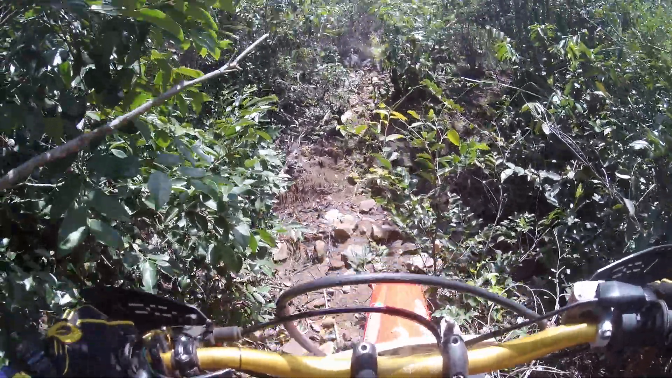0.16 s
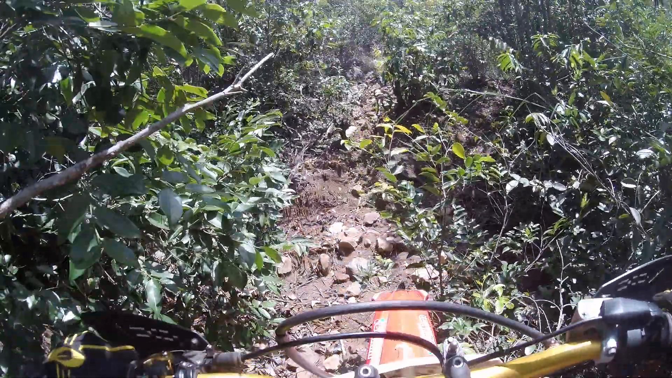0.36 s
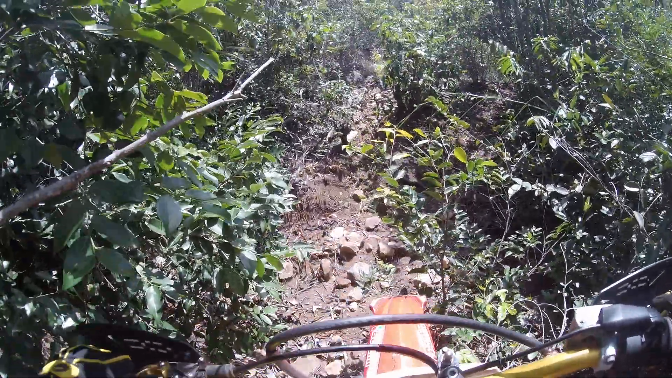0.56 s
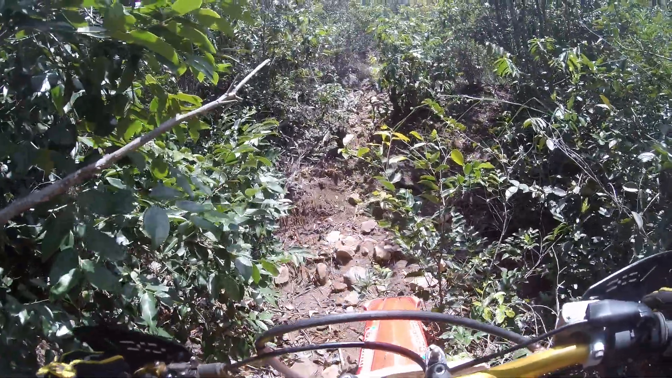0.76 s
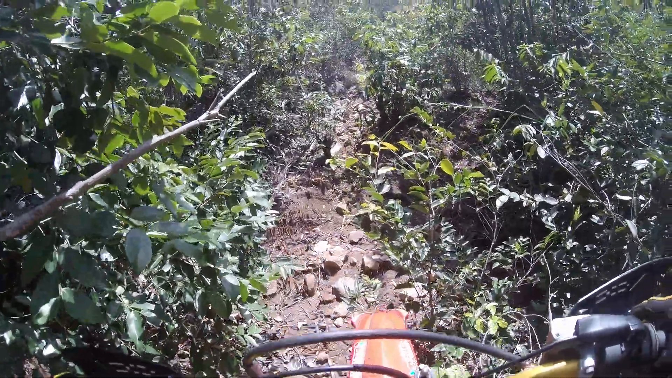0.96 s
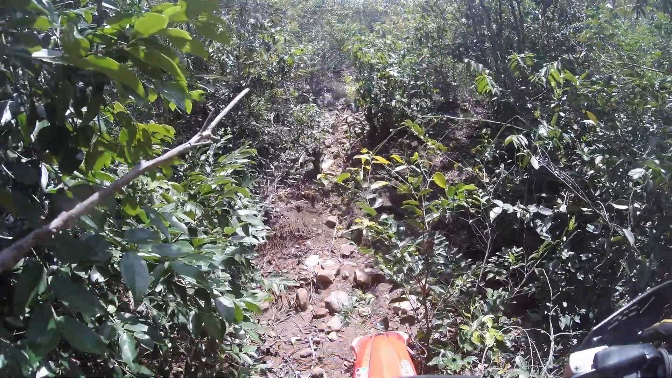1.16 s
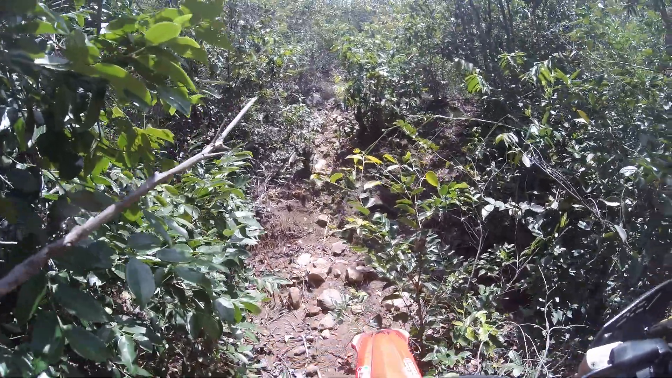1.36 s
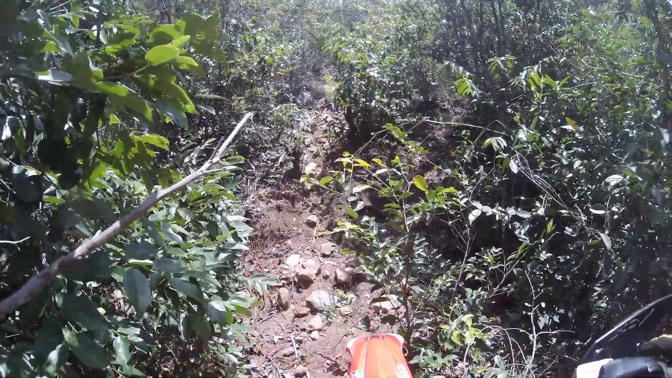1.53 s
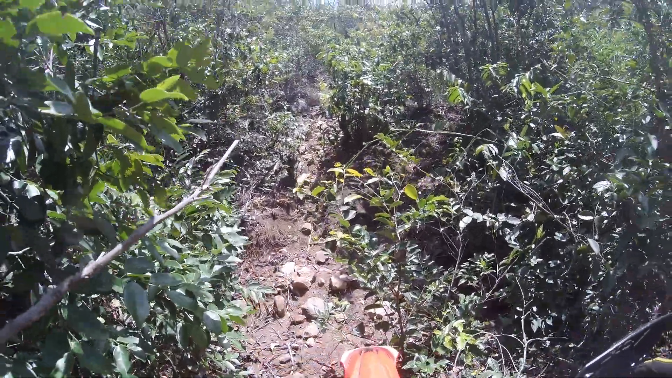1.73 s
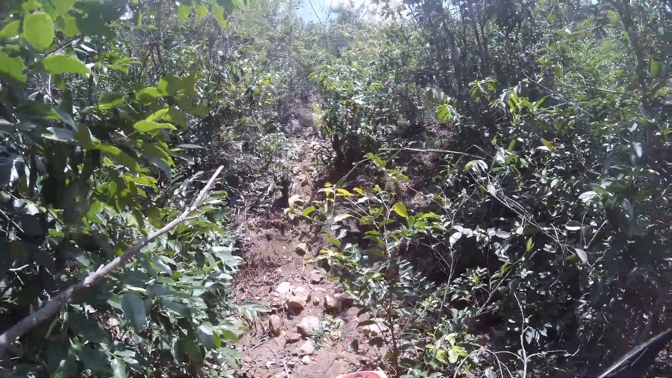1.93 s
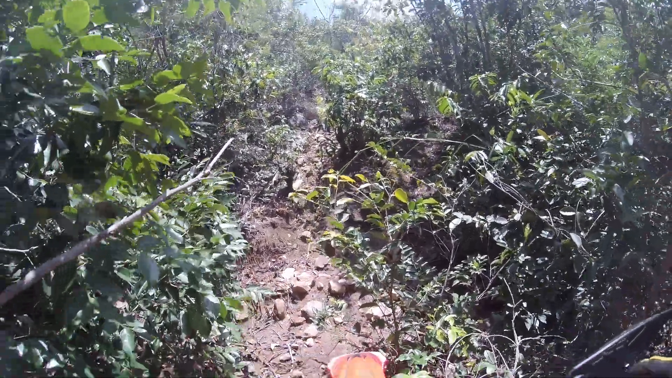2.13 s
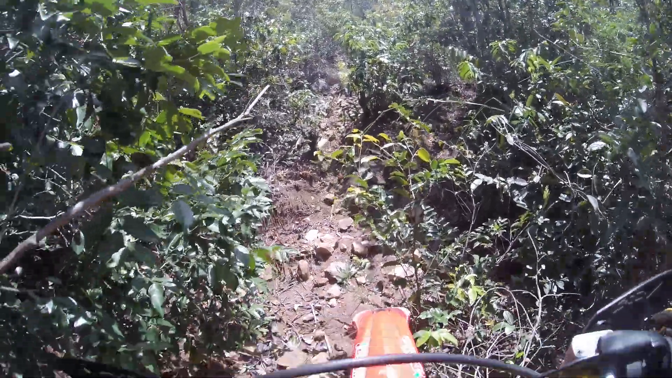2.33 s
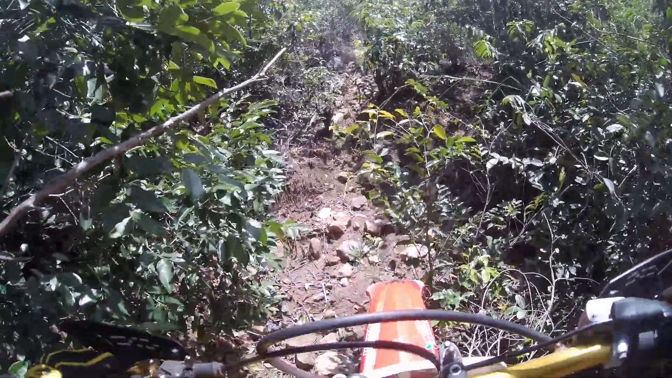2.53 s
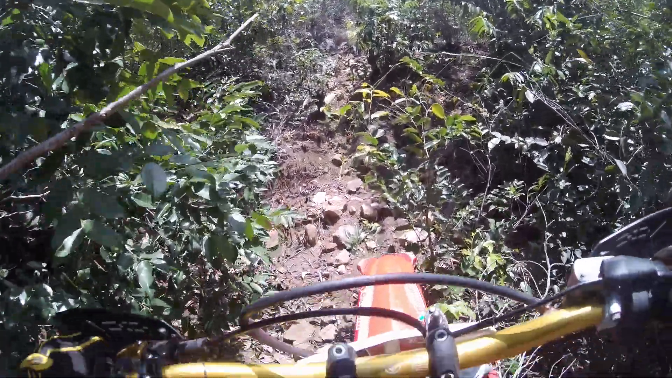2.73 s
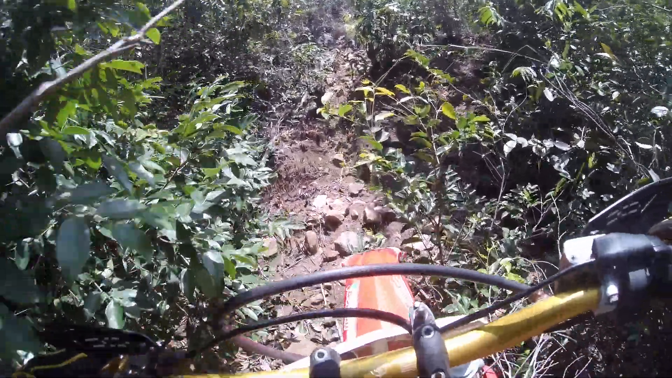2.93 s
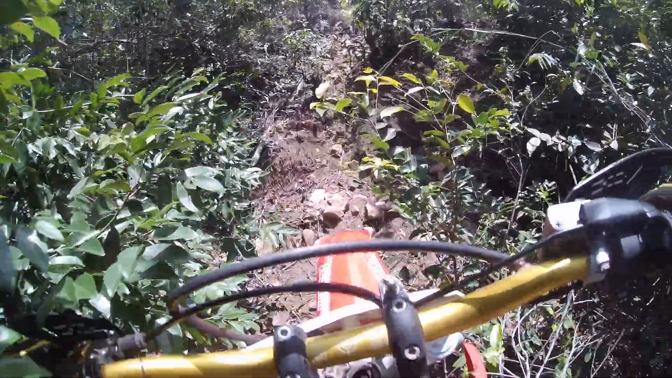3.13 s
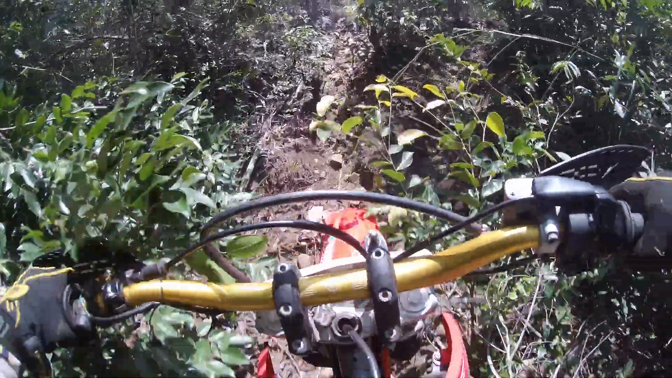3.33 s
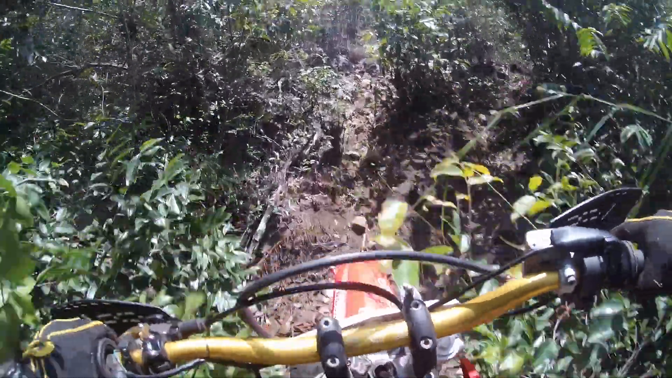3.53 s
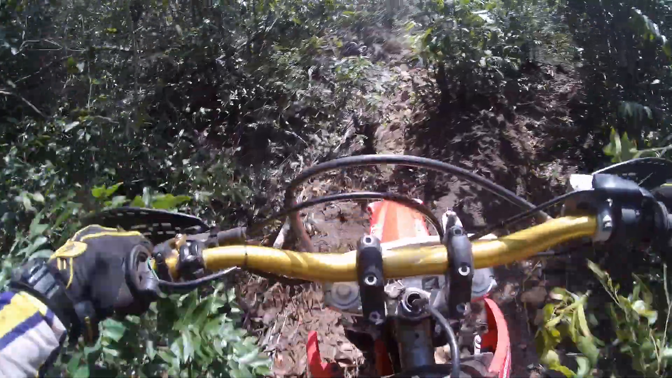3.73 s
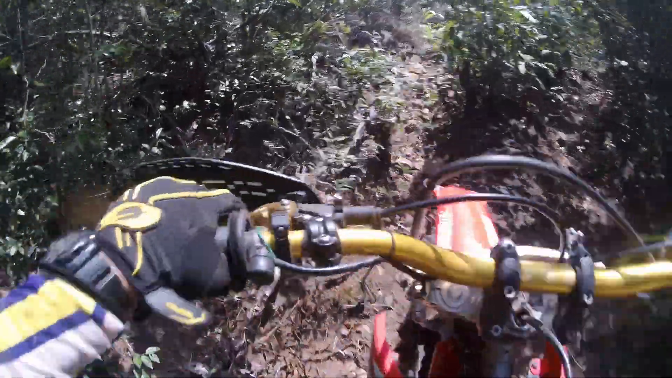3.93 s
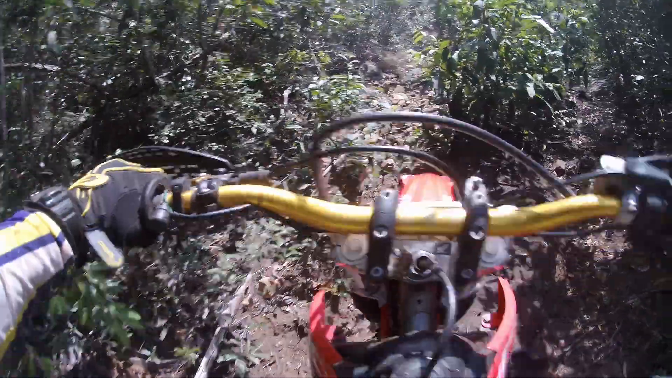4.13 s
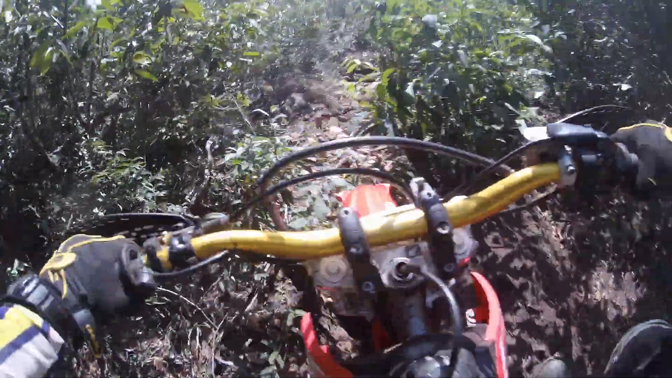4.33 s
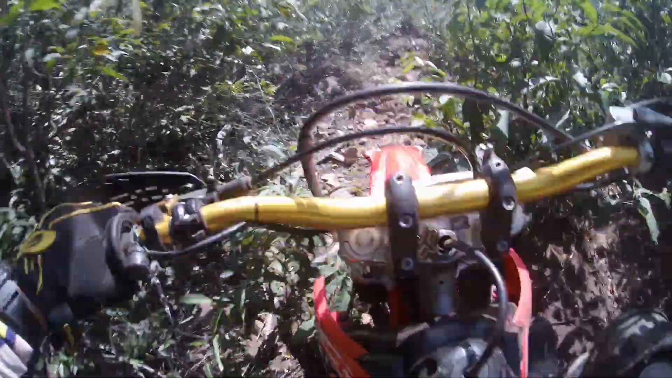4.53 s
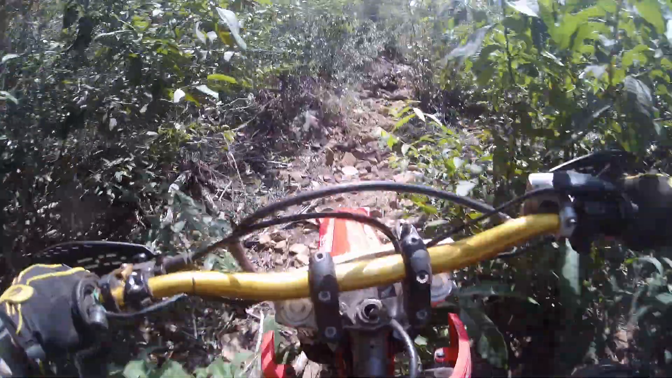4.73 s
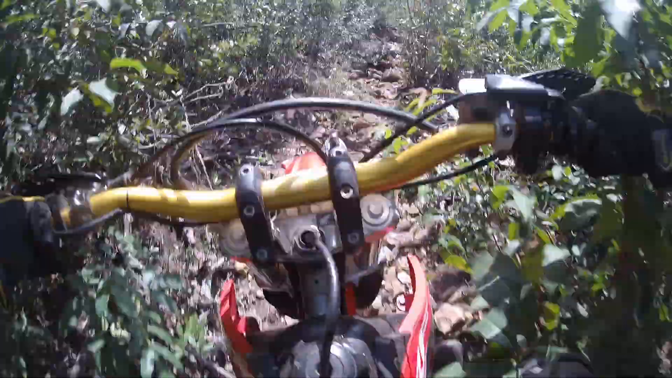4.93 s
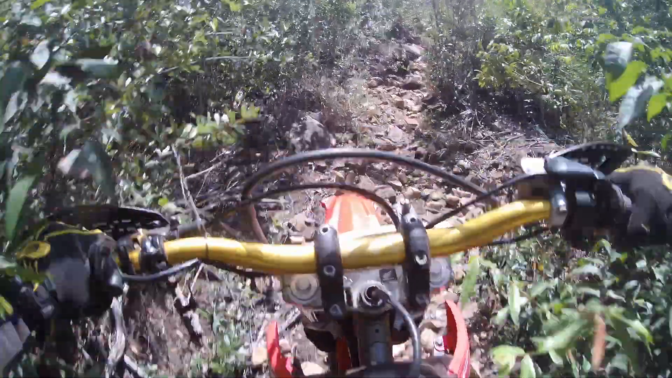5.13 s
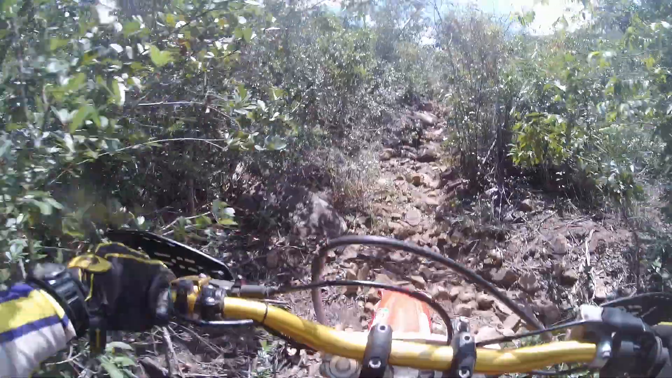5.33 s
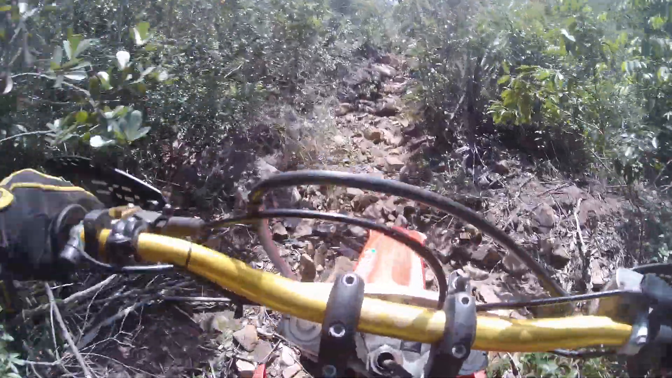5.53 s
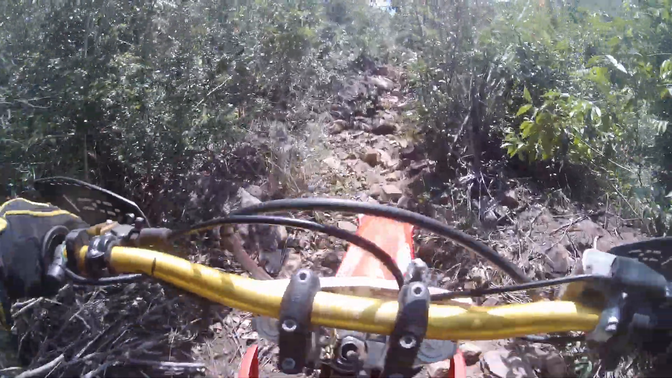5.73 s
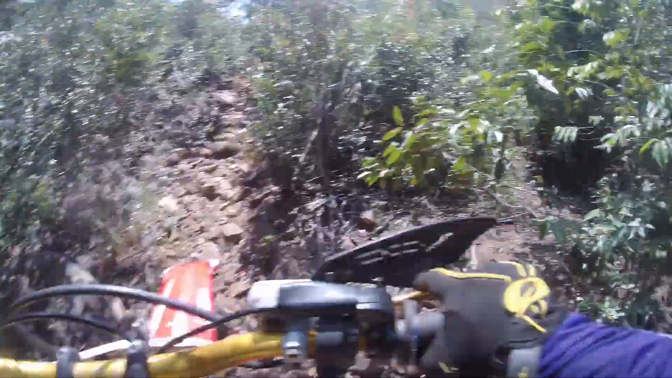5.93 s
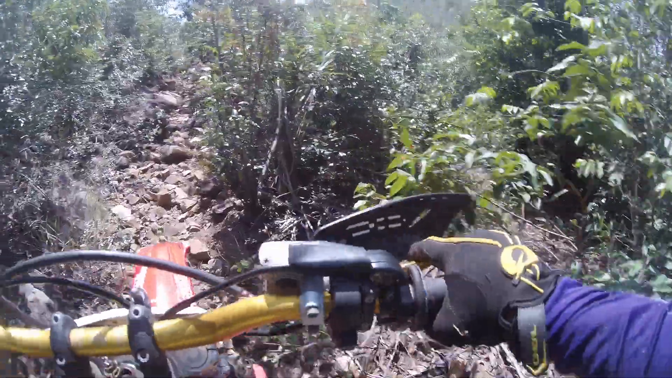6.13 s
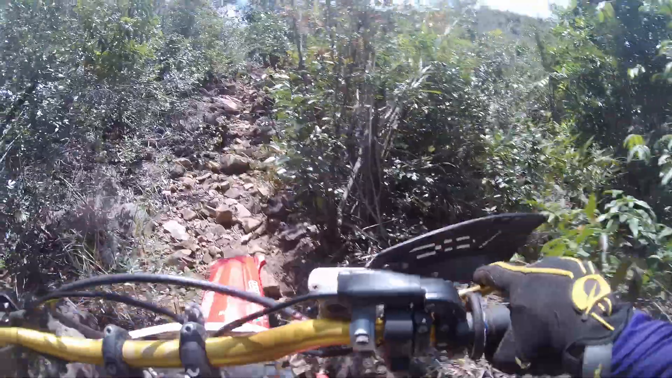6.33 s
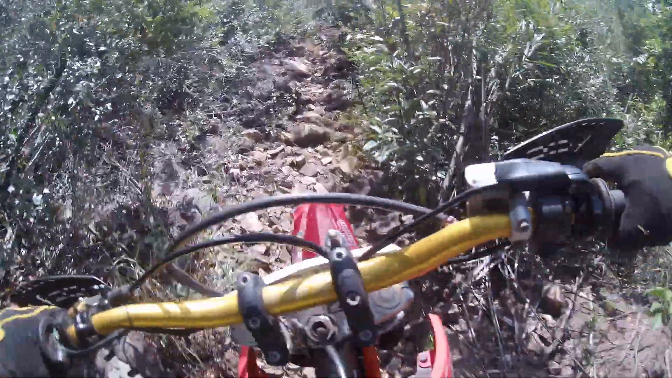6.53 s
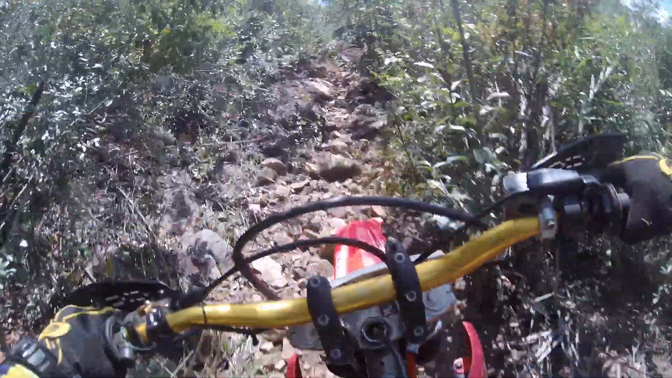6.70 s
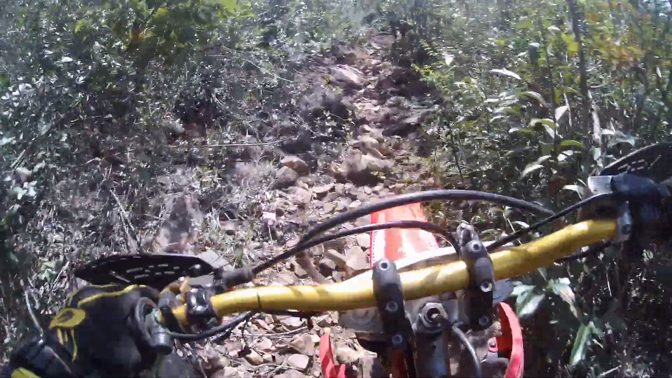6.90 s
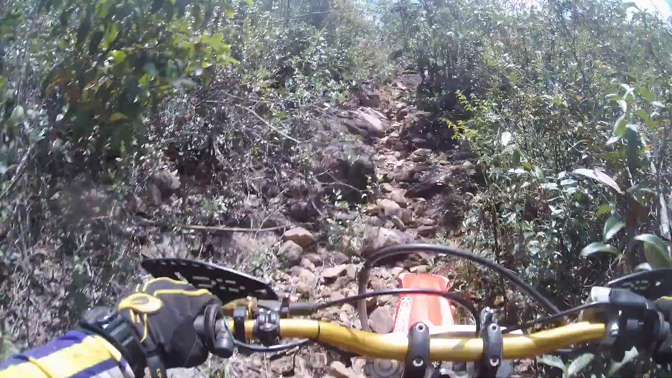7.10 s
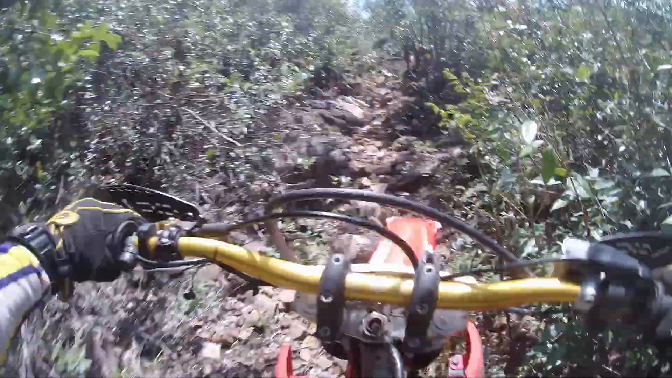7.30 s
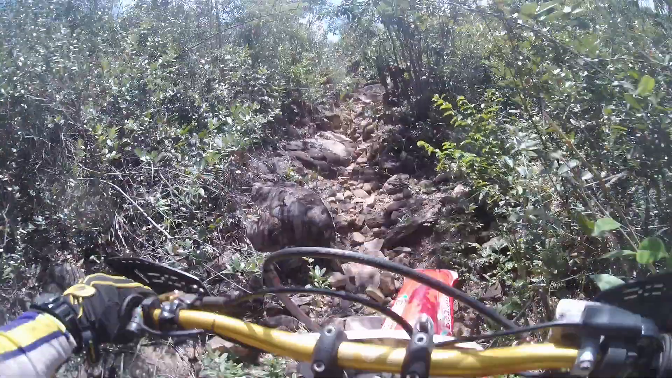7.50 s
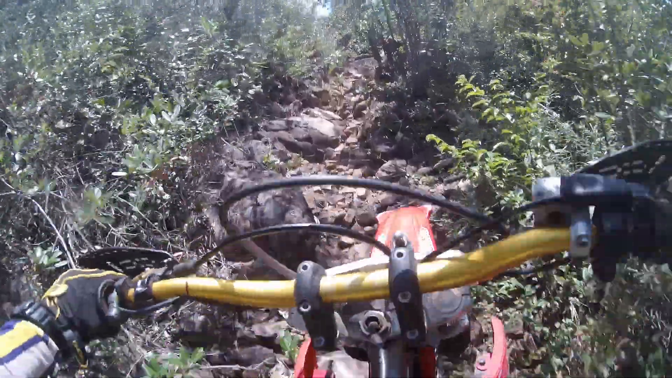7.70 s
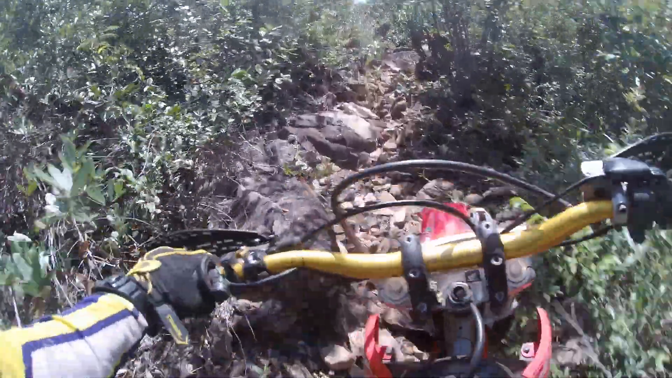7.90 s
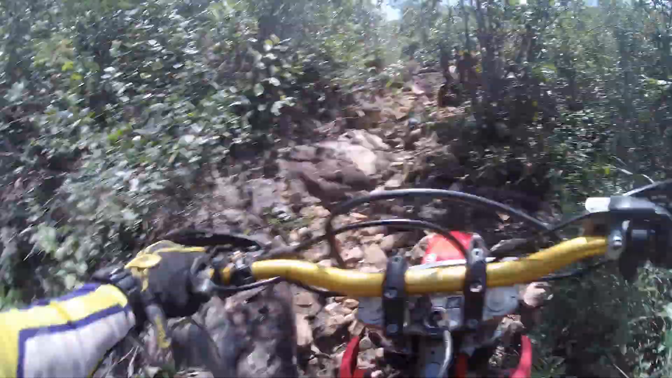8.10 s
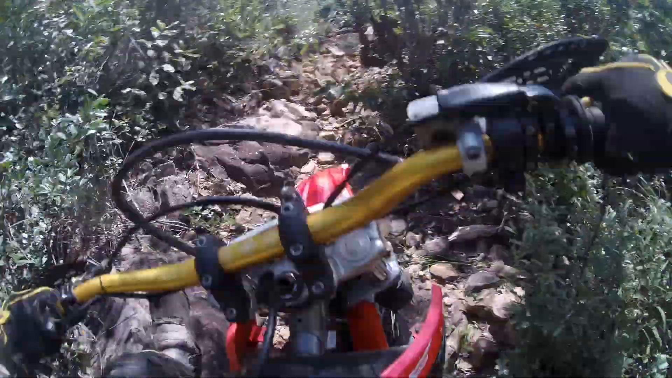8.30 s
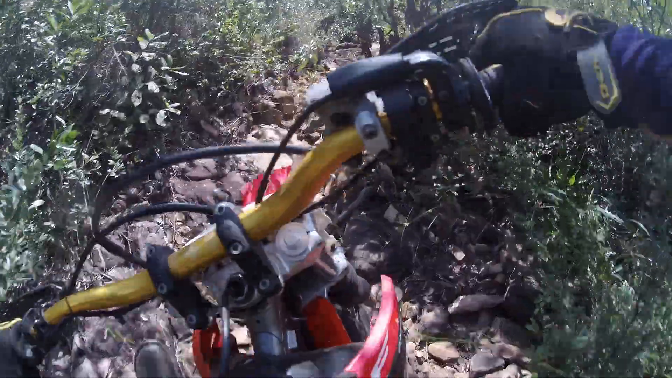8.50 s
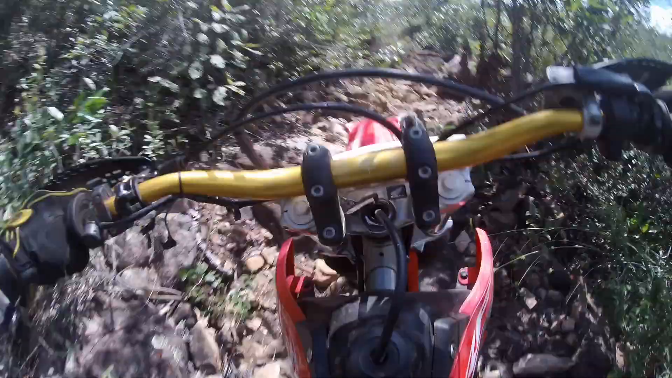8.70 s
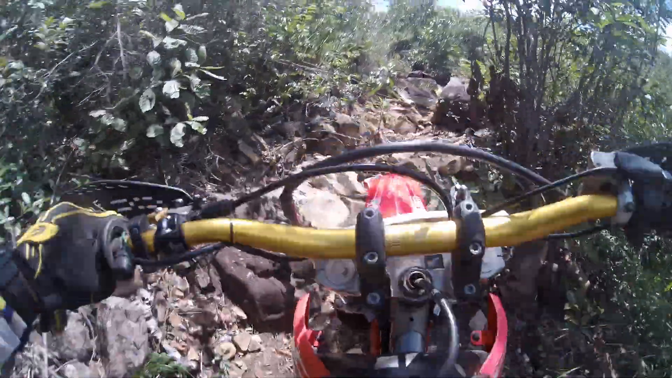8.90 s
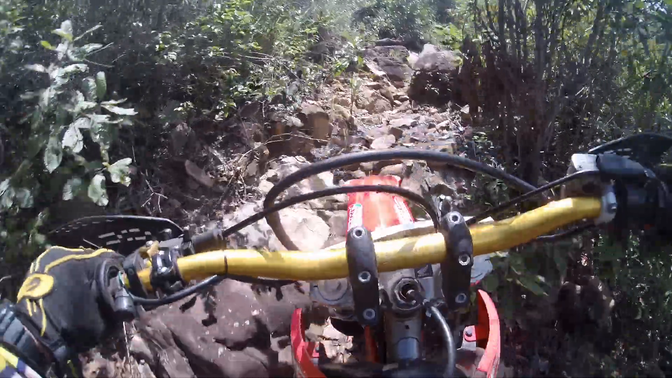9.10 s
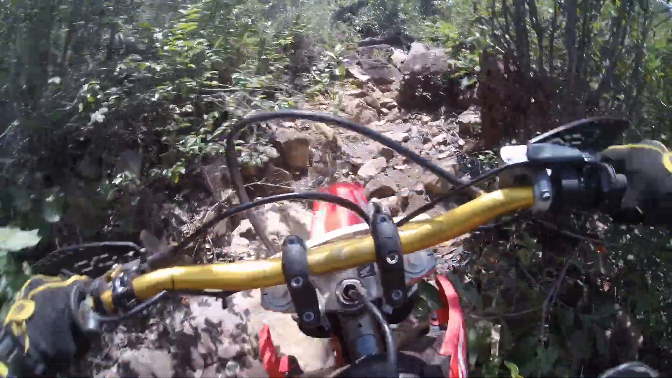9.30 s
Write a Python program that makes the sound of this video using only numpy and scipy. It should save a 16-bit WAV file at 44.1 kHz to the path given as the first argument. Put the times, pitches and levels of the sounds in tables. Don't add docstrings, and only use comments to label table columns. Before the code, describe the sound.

Weak, slow turning-over opens the scene; an electric starter grinds at about 0.1-0.35 s and a two-stroke engine catches around 0.4 s, with a few snaps and knocks by 0.75 s. Until 2 s it ticks along lightly, low uneven pops under hissing piston clatter. From 2.2 s it loads up, and a gear whine slides and wavers with the clutch near 2.7 s. After 3.3 s the bike climbs: wheels rumble over rubble, rocks thump and rattle. Hard blows land near 4.0, 4.6 and 4.9 s, revs dipping then recovering. Steadier lugging follows, with knocks near 6 s, then violent bangs at 7.35 and 7.5 s, a ringing shell, and dense jolts from 8.1 to 8.8 s. Faint falling chain squeaks appear at 8.3-8.95 s as the engine bogs and quietens, before pulling again around 9.3 s. Close, muffled, boxy helmet microphone outdoors, overloading on impacts.

```python
import sys
import numpy as np
from scipy import signal
from scipy.fft import rfft, irfft, next_fast_len
from scipy.io import wavfile
from scipy.ndimage import uniform_filter1d, map_coordinates

SR = 44100
rng = np.random.default_rng(int(sys.argv[2]) if len(sys.argv) > 2 else 0)


def output_pcm(signal):
    pcm = np.clip(np.atleast_2d(signal).T, -1, 1) * 32767
    wavfile.write(sys.argv[1], SR, np.round(pcm).astype(np.int16))


def field_ratio(decibels):
    return 10 ** (np.asarray(decibels, dtype=float) / 20)


N = 412335

# f/Hz, level/dB
CASE_COLOUR = [(290, -10), (500, -12), (629, -25), (901, -14), (1150, -4.5), (1430, -20.5), (1700, -15.5),
               (1990, -32), (2330, -13.5), (3150, -9), (3740, -4.5), (5510, -14.5), (8600, -22),
               (10100, -17.5), (15500, -25)]
# f/Hz, width/Hz, level/dB
MOUNT_MODES = [(137, 83.5, 9.5), (321, 164, 3), (1120, 347, -2)]
# t/s, roughness/dB
RUBBLE = [(0, -47), (.6, -31), (1.2, -47), (2.2, -45), (2.45, -31), (3.3, -30), (3.65, -26), (4.4, -22),
          (4.65, -33), (5.4, -28), (6.9, -28), (7.8, -30), (8.15, -27), (8.85, -38), (9.35, -27)]
# t/s, thump level/dB, rattle level/dB
ROCK_JOLTS = [(0.404, -48, -30), (0.677, -39, -23.5), (0.743, -42, -30), (3.318, -18, -33),
              (3.596, -11, -17), (3.658, -18, -23), (3.807, -11, -19), (3.96, -51, -17),
              (3.991, -10.5, -28), (4.302, -16, -29), (4.512, -12, -36), (4.604, 0.5, -6.5),
              (4.892, -7, -9.5), (5.407, -13, -22.5), (5.946, -23, -15), (6.242, -8, -17.5),
              (6.435, -14, -28), (6.809, -13.5, -38), (7.106, -11, -23), (7.347, -30, -7.5),
              (7.507, 0, -13.5), (7.563, -9.5, -35), (7.943, -7, -15), (8.137, -11, -15), (8.164, -3, -3),
              (8.273, -11, -12), (8.365, -12, -23), (8.437, -7.5, -48), (8.515, -19, -52),
              (8.641, -13, -16), (8.757, -1, -14.5), (8.955, -13, -36), (9.291, -18, -15.5)]
# t/s, level/dB
STARTER_LEVEL = [
    (0.12, -58),
    (0.2, -27.5),
    (0.34, -33.5),
]
# t/s, peak level/dB, t60/s, tilt/dB an octave
SHARP_SNAPS = [(0.3902, -14.5, 0.11, -2), (0.633, -14.5, 0.19, -6.5), (0.667, -8.5, 0.019, -4),
               (0.672, -21, 1, -1), (0.73, 3, 0.006, -15.5), (2.355, -14, 0.17, -4.5),
               (2.435, -12, 0.12, -3), (3.299, -6, 0.059, 16), (3.457, -13, 0.21, 6),
               (3.971, 8, 0.0031, -7), (4.8031, -17.5, 0.65, -1.5), (5.04, -17, 0.037, 4),
               (5.4833, -10, 0.13, -1.5), (6.1665, -11.5, 0.027, -4.5), (7.1453, -2.5, 0.032, -5),
               (8.15, 6.5, 0.0065, -13), (8.635, -20, 0.2, -5.5)]
# t/s, length/s, start f/Hz, end f/Hz
CHAIN_SQUEAKS = [
    (8.31, .07, 3050, 2980),
    (8.38, .08, 2980, 2550),
    (8.5, .085, 3050, 2350),
    (8.67, .06, 3400, 2900),
    (8.92, .05, 3800, 3300),
]
# t/s, peak level/dB,
# f/Hz
HELMET_KNOCKS = [(0.666, -17, 435), (.733, -19, 467), (2.779, -22, 597), (2.815, -23.5, 605),
                 (3.805, -28.5, 323), (3.971, -6, 400), (4.297, -7.5, 190), (4.428, -7.5, 212.4),
                 (4.507, -8, 178), (4.596, 6, 295), (4.895, 1, 168), (4.915, -13, 120), (5.935, -9, 222),
                 (5.953, -10, 297), (6.165, -35, 496), (7.344, 8, 231.5), (7.353, 3, 97.2),
                 (7.509, -17, 296), (8.135, -2, 140.4), (8.151, -19, 467), (8.258, -9, 130),
                 (8.272, 0.5, 280), (8.445, -4, 154), (8.503, -14.5, 300), (8.614, -13, 294),
                 (8.625, -12, 300), (8.705, -17, 260), (8.642, -18, 377), (8.655, 2, 123), (8.677, -4, 202),
                 (8.762, -1, 189), (8.958, -19, 264)]
# t/s, peak level/dB, f/Hz, t60/s
STRUCK_PARTS = [
    (.735, -31, 486, 0.27),
    (5.362, -25, 465, 0.22),
    (5.435, -23, 478, 0.42),
    (7.145, -11, 1327, 0.027),
    (7.147, -19, 1650, 0.025),
    (7.348, -7, 477, 0.26),
    (8.175, -12, 466, 0.18),
    (8.37, -32, 475, 0.23),
    (8.524, -40, 470, 0.21),
    (8.956, -34, 478, .2),
]
# t/s, rate/turns a second
CRANK_SPEED = [(0, 12.7), (0.29, 11.81), (0.39, 25.42), (0.56, 24.29), (0.63, 28.86), (1.43, 25.37),
               (1.66, 26.4), (2.85, 26.05), (3.63, 29.42), (4.3, 30.69), (4.63, 33.49), (4.93, 22.74),
               (5.6, 29.89), (6.93, 25.65), (7.92, 27.18), (8.42, 20.47), (8.93, 19.56), (9.36, 25.92)]
# t/s, sudden change/turns a second
WHEEL_GRIPS = [(0.3, 1.3), (0.41, -1.3), (0.74, 2.34), (2.12, -2.4), (2.63, 5.23), (2.73, 6.69),
               (2.88, 2.29), (3.48, -4.42), (3.93, 1.5), (4.23, -2.59), (4.49, -6.34), (5.02, -1.88),
               (5.15, 4.45), (5.7, -1.45), (5.77, -1.85), (6.17, 1.57), (6.46, -3.61), (6.96, -1.33),
               (7.96, 2.36), (8.27, -3.76), (8.73, 1.56), (8.93, -3.6)]
# t/s, full firing peak level/dB, mechanical effort level/dB
ENGINE_WORK = [(0, -38, -48), (.3, -10, -35), (.68, -16.5, -34.5), (.88, -11.5, -32.5),
               (1.06, -17.5, -36.5), (2.05, -18.5, -37), (2.36, -10, -34), (2.6, -9, -28.5),
               (2.82, -6.5, -27.5), (3.3, -8.5, -27.5), (4.3, -7, -28), (4.85, -11.5, -33),
               (5.3, -7.5, -28.5), (6.9, -8.5, -29.5), (7.5, -9, -31.5), (8.1, -8, -30), (8.88, -20, -43.5),
               (9.3, -6, -25.5)]
# t/s, tooth-meeting f/Hz, load level/dB
GEAR_COURSE = [(.66, 1096, -56), (.86, 1240, -35), (1.06, 1078, -70), (2.2, 1122, -42.5),
               (2.6, 1120, -41.5), (2.71, 1392, -37.5), (2.86, 1426, -44), (2.89, 1282, -41),
               (3.45, 1253, -44), (4.12, 1332, -41), (4.6, 1240, -39.5), (4.95, 1062, -79),
               (5.2, 1263, -45), (5.8, 1221, -41.5), (6.12, 1310, -40), (6.5, 1178, -45), (7.9, 1240, -44),
               (8.2, 1094, -67)]
# t/s, length/s, start f/Hz, end f/Hz
CHAIN_SNATCHES = [(.75, .07, 1420, 1270), (.82, .15, 1270, 1180), (2.2, .1, 1090, 1110),
                  (2.31, .04, 1150, 1110), (2.355, .07, 1240, 1115), (2.44, .12, 1290, 1020),
                  (2.58, .04, 1170, 1090), (2.62, .04, 1270, 1190), (2.7, .16, 1410, 1425),
                  (2.89, .5, 1285, 1245), (3.48, .1, 1340, 1080), (4.2, .11, 1480, 1210),
                  (4.42, .09, 1500, 1220), (4.73, .08, 1240, 1125), (4.81, .05, 1100, 980),
                  (5.2, .06, 1280, 1180), (5.31, .05, 1310, 1140), (5.7, .11, 1270, 1170),
                  (6.38, .1, 1270, 1060), (6.53, .12, 1240, 1030), (6.66, .06, 1150, 1000),
                  (6.73, .08, 1260, 1120), (6.86, .16, 1185, 1125), (7.15, .05, 1230, 1100),
                  (7.2, .05, 1230, 1090), (7.28, .05, 1240, 1170), (7.91, .04, 1270, 1220),
                  (8.03, .12, 1270, 1030), (9.17, .1, 1110, 1020)]
# t/s, length/s, change/dB
GEAR_SLACKS = [
    (.8, .16, -1.5),
    (2.31, 0.38, -2),
    (3.6, 0.45, 0),
    (8.03, .12, -5),
    (4.2, 0.057, 5.5),
    (4.42, 0.079, 2),
    (7.03, 0.099, -23),
    (7.34, 0.19, -9),
    (6.86, 0.129, 3),
]
# multiple, level/dB
TOOTH_HARMONICS = [(1, 4), (2, -2.5), (3, 6), (4, -6)]
# f/Hz, width/Hz, level/dB
CASING_MODES = [(1700, 150, -10), (2350, 160, -10), (3620, 70, 1), (3960, 85, 1), (4600, 200, -3),
                (4950, 70, 4), (5950, 170, -13), (6800, 200, -8), (9950, 800, -12), (12200, 700, -14)]
# t/s of the first, turns in a row, change/dB
WEAK_FIRINGS = [(.045, 1, 8), (.2, 1, -16), (.29, 1, -7), (.39, 1, 3), (.436, 4, -10), (.702, 1, -13),
                (.77, 3, -7), (.907, 1, -12), (1.125, 1, -13), (1.2, 2, -13), (1.548, 1, -7),
                (1.966, 1, -13), (2.118, 5, -4), (2.397, 4, -17), (2.729, 5, -5), (2.885, 1, -24),
                (2.95, 1, -7), (3.052, 2, -6), (3.264, 1, -8), (3.474, 2, -14), (4.195, 1, -10),
                (4.462, 1, -18), (4.666, 2, -5), (4.735, 1, -17), (4.931, 4, -4), (5.326, 1, -18),
                (7.165, 1, -24), (7.396, 2, -4), (7.547, 5, -5), (8.226, 1, -12), (8.527, 1, -25),
                (8.729, 1, -11), (8.874, 5, -7)]
# f/Hz, width/Hz, level/dB
PIPE_MODES = [(104, 40, -4), (160, 30, -12), (228, 40, -7), (272, 20, -12), (325, 55, 2), (430, 90, -13)]
# delay t/s, level/dB
PIPE_ECHOES = [
    (0.0088, -8),
    (0.019, -24.5),
]
# f/Hz, width/Hz, level/dB
FRAME_MODES = [(52.6, 75, -26), (84, 24, 5), (106.7, 35, 0)]


def unit(x):
    return x / np.sqrt(np.mean(x ** 2) + 1e-20)


def curves(rows):
    s, *cols = np.transpose(rows)
    return [np.interp(np.arange(N) / SR, s, c) for c in cols]


def wobble(rate):
    knots = rng.standard_normal(int(N * rate / SR) + 4)
    return map_coordinates(knots, [np.arange(N) * rate / SR])


def filtered(x, response):
    m = next_fast_len(N + SR // 2)
    return irfft(rfft(x, m) * response(np.fft.rfftfreq(m, 1 / SR)), m)[:N]


def modes(table):
    def response(f):
        total = 0
        for k, (c, w, db) in enumerate(table):
            total = total + (-1) ** k * field_ratio(db) * 1j * f * w / (c * c - f * f + 1j * f * w)
        return total
    return response


def train(times, sizes):
    at = np.round(times * SR).astype(int)
    keep = (at >= 0) & (at < N)
    return np.bincount(at[keep], sizes[keep], N)


def stretch(s, length):
    return slice(round(s * SR), round(s * SR) + round(length * SR))


def housing(f):
    hz, db = np.transpose(CASE_COLOUR)
    return field_ratio(np.interp(np.log(f + 1), np.log(hz), db))


def shell(f):
    return 1 + field_ratio(10) * modes([(478, 14, 0)])(f)


def rumble():
    level_db = curves(RUBBLE)[0] - 14 * (np.arange(N) < 3.3 * SR)
    deep = filtered(rng.standard_normal(N), modes([(46.5, 18, 0)]))
    return field_ratio(level_db) * unit(field_ratio(5.5 * wobble(12)) * deep)


def jolts():
    thumps, rattle, t = np.zeros(N + SR), np.zeros(N + SR), np.arange(SR // 4) / SR
    for s, db, rattle_db in ROCK_JOLTS:
        phase = 2 * np.pi * 52 * (t - 3 * 0.0192 * np.exp(-t / 0.0043))
        swing = np.exp(-.5 * ((t - .019) / 0.01) ** 2) * (1 - np.exp(-t / 0.0095))
        ring = field_ratio(rattle_db - 17.5 - 60 * t / .3) * np.sin(2 * np.pi * 478 * t) * (1 - np.exp(-t / .006))
        thumps[round(s * SR):][:len(t)] += field_ratio(db + 2) * swing * np.sin(phase + 1) + ring
        shake = np.exp(-.5 * ((t - .037) / 0.0081) ** 2)
        rattle[round((s - .035) * SR):][:len(t)] += field_ratio(rattle_db + 4.5) * shake
    rattle = rattle[:N] + field_ratio(curves(RUBBLE)[0] + 3 * wobble(16))
    noise = rng.standard_normal(N)

    def mount(f):
        return modes(MOUNT_MODES)(f) * shell(f) / (1 + (f / 520) ** 4) ** .5

    return thumps[:N] + filtered(rattle * noise, mount) / np.std(filtered(noise, mount))


def starter():
    first_s, last_s = STARTER_LEVEL[0][0] - .02, STARTER_LEVEL[-1][0] + 0.037
    db, = curves([(first_s, -90)] + STARTER_LEVEL + [(last_s, -90)])
    grind = field_ratio(0.88 * wobble(72)) * rng.standard_normal(N)
    return field_ratio(db) * unit(filtered(grind, modes([(4660, 140, 10.0), (3700, 710, -2.5), (1240, 320, -6.0)])))


def snaps():
    out, t = np.zeros(N + SR), np.arange(4096) / SR
    f = np.fft.rfftfreq(len(t), 1 / SR)
    for s, db, t60, tilt_db in SHARP_SNAPS:
        colour = housing(f) ** 0.82 * field_ratio(tilt_db * np.log2(f / 3000 + 0.058)) * (f > 300)
        crack = unit(irfft(rfft(rng.standard_normal(len(t))) * colour))
        rise_s = min(.14 * t60 ** 2, .01)
        out[round(s * SR):][:len(t)] += field_ratio(db - 8 - 60 * t / t60) * (1 - np.exp(-t / rise_s)) * crack
    return out[:N]


def squeaks():
    out = np.zeros(N)
    rough, drift = field_ratio(4 * wobble(70)), 1 + .012 * wobble(120)
    for s, length, start_hz, end_hz in CHAIN_SQUEAKS:
        span = stretch(s, length)
        hz = np.linspace(start_hz, end_hz, round(length * SR)) * drift[span]
        out[span] = np.hanning(len(hz)) ** .5 * np.sin(2 * np.pi * np.cumsum(hz) / SR)
    return field_ratio(-44) * rough * out


def rings():
    out, t = np.zeros(N + SR), np.arange(SR // 4) / SR
    for s, db, hz, t60 in STRUCK_PARTS:
        onset = 1 - np.exp(-t / t60 / 0.0053)
        out[round(s * SR):][:len(t)] += field_ratio(db - 60 * t / t60) * np.sin(2 * np.pi * hz * t) * onset
    return out[:N]


def knocks():
    out, t = np.zeros(N + SR), np.arange(-SR // 50, SR // 16) / SR
    swing_cycles, sag_s, edge_db = 0.75, 0.021, -11
    for s, db, hz in HELMET_KNOCKS:
        phase = 2 * np.pi * hz * sag_s * (1 - np.exp(-t / sag_s))
        shape = np.exp(-.5 * (t * hz / np.where(t < 0, .6, 1.5) / swing_cycles) ** 2)
        contact = (t >= 0) * np.exp(-abs(t) / 0.0033) * np.sin(3 * phase)
        edge = field_ratio(edge_db) * (hz / 350) ** 2.4 * contact
        out[round(s * SR) - SR // 50:][:len(t)] += field_ratio(db) * (shape * np.cos(phase) + edge)
    return out[:N]


def crank():
    settle_s, first_turn = .15, .431
    grips = signal.lfilter([1], [1, -np.exp(-1 / settle_s / SR)], train(*np.transpose(WHEEL_GRIPS)))
    speed = curves(CRANK_SPEED)[0] + grips
    return speed, first_turn + np.cumsum(speed) / SR


def overrun():
    hz, load_db = curves(GEAR_COURSE)
    snatching = np.zeros(N)
    for s, length, start_hz, end_hz in CHAIN_SNATCHES:
        span = stretch(s, length)
        hz[span] = np.linspace(start_hz, end_hz, round(length * SR))
        snatching[span] = 1
    load_db = np.where(snatching > 0, np.maximum(load_db, -41) + 4, load_db)
    for s, length, db in GEAR_SLACKS:
        load_db[round(s * SR):round((s + length) * SR)] += db
    return uniform_filter1d(np.array([hz, load_db, snatching]), SR // 100, axis=1)


def gear_whine(turns, load, slack_db):
    hz, gear_db, snatching = overrun()
    loose = 1 - .65 * snatching
    scatter = rng.standard_normal(300)[(turns - .1).astype(int)]
    hz *= 1 + loose * .013 * uniform_filter1d(scatter, SR // 200)
    swing = (.085 + .005 * slack_db) * uniform_filter1d(.5 - (turns - .1) % 1, SR // 200)
    hz *= 1 + loose * swing + .01 * loose * wobble(140)
    angle = 2 * np.pi * np.cumsum(hz) / SR
    whine = np.zeros(N)
    for k, db in TOOTH_HARMONICS:
        level_db = db + .9 * (k - 1) * slack_db + 2.2 * wobble(45) + 1.5 * k * loose * wobble(220)
        rasp = .36 * (k - 1) * wobble(600)
        whine += field_ratio(level_db) * np.sin(k * angle + rasp)
    bright = modes(CASING_MODES[2:4])
    return filtered(field_ratio(gear_db + 2.0) * load * whine,
                    lambda f: housing(f) ** 0.3 * (1 + field_ratio(-0.5) * bright(f)))


def backlash(load, effort_db):
    level_db = -41.5 + 0.68 * (effort_db + 34.5) + 1.6 * wobble(7.4)
    chatter = load ** 0.5 * field_ratio(3.5 * wobble(90)) * rng.standard_normal(N)
    return field_ratio(level_db) * unit(filtered(chatter, lambda f: housing(f) * (f < 2000) * (f > 480)))


def piston_clatter(turns, load, effort_db, slack_db):
    after_firing = 1.9 * np.exp(-((turns - .07) % 1) / .25)
    half_turn_on = 1.0 * np.exp(-((turns + .4) % 1) / .12)
    slaps = uniform_filter1d(1 + after_firing + half_turn_on, SR // 200)
    slaps *= field_ratio(0.53 * wobble(150) + 0.81 * wobble(65) + 1.14 * wobble(25))
    casings = np.zeros(N)
    for k in range(5):
        patch = filtered(slaps * rng.standard_normal(N), modes(CASING_MODES[k::5]))
        casings += load ** 0.026 * field_ratio(2.1 * wobble(60)) * patch
    hiss = filtered(load ** 0.22 * slaps * rng.standard_normal(N), lambda f: housing(f) * (f > 1400))
    clatter = unit(hiss) + 0.65 * field_ratio(-.45 * slack_db) * unit(casings)
    return field_ratio(effort_db - 1.5) * unit(clatter)


def mechanics():
    fire_db, effort_db = curves(ENGINE_WORK)
    slack_db = np.minimum(fire_db + 8, 0)
    turns = crank()[1]
    load = field_ratio(2.73 * np.cos(2 * np.pi * (turns - .02)) + 2.1 * np.cos(4 * np.pi * (turns - .3)))
    whine = gear_whine(turns, load, slack_db)
    return whine + backlash(load, effort_db) + piston_clatter(turns, load, effort_db, slack_db)


def firings():
    turns = crank()[1]
    times = np.interp(np.arange(1, turns[-1]), turns, np.arange(N) / SR)
    short = np.zeros(len(times))
    for at, count, db in WEAK_FIRINGS:
        short[np.argmin(abs(times - at)):][:int(count)] = db
    full = np.interp(times, *np.transpose(ENGINE_WORK)[:2])
    return times, full + short + .9 * rng.standard_normal(len(times)), short


def frame_hum(times, short):
    scatter = .8 * rng.standard_normal(len(times))
    hum = filtered(train(times + 0.0069, field_ratio(0.032 * short + scatter)),
                   lambda f: modes(FRAME_MODES)(f) * np.exp(-(f / 200) ** 2))
    hum /= np.sqrt(abs(uniform_filter1d(hum ** 2, SR // 4))) + 1e-6
    cranking = np.arange(N) < .28 * SR
    return field_ratio(-25 + .3 * curves(ENGINE_WORK)[0] - 5 * cranking + 1.2 * wobble(6)) * hum


def exhaust(times, db, short):
    def pop(f):
        body = np.exp(-(f / 330) ** 3) + field_ratio(-35.5) * np.exp(-(f / 900) ** 2)
        return -f / 300 * body * np.exp(-1.1j)

    def pipe(f):
        echoes = sum(field_ratio(g) * np.exp(-2j * np.pi * f * s) for s, g in PIPE_ECHOES)
        return 1 + modes(PIPE_MODES)(f) + echoes

    pops = filtered(train(times - .0008, field_ratio(db + 41.5)), lambda f: pop(f) * pipe(f) * shell(f))
    return pops + frame_hum(times, short)


def scene():
    port = 1 - np.exp(-((np.arange(N) / SR - 3.979) / .005) ** 4)
    trail = rumble() + jolts() + snaps()
    blows = knocks() + rings()
    engine = exhaust(*firings()) + port * mechanics() + starter() + squeaks()
    return (trail + blows + engine)[None]


def top_cut(x):
    return signal.sosfilt(signal.butter(12, 15700, fs=SR, output="sos"), x)


def record(dry):
    bass_cut = filtered(dry[0], lambda f: 1j * f / 14 / (1 + 1j * f / 14))
    overloaded = np.clip(bass_cut, -1, 1)
    mix = filtered(overloaded, lambda f: f < 15450)[None]
    return top_cut(mix)


dry = scene()
out = record(dry)
output_pcm(out)
```